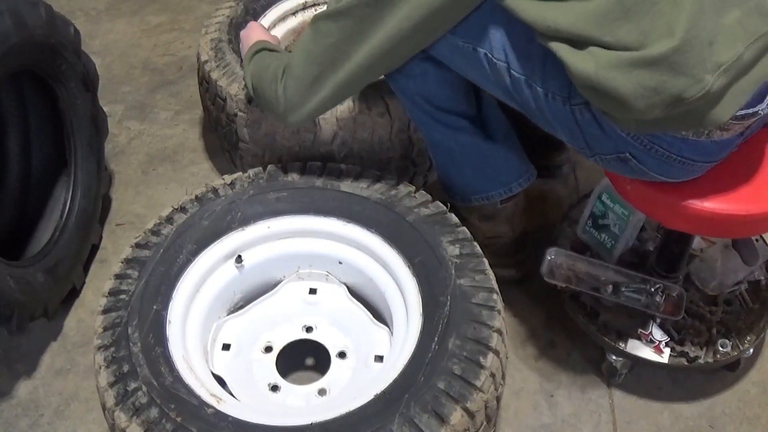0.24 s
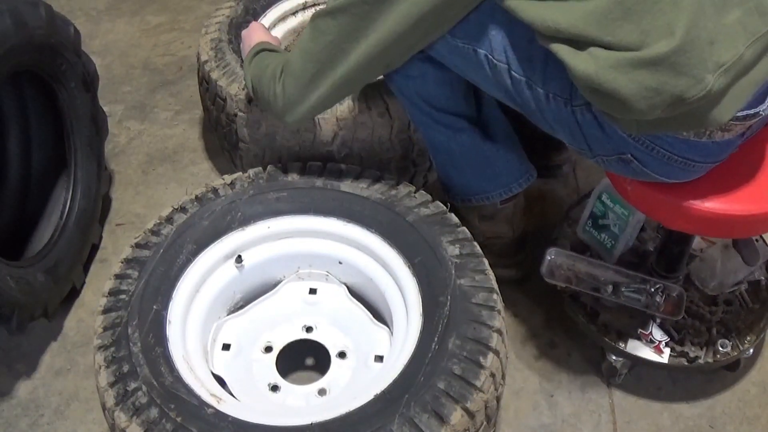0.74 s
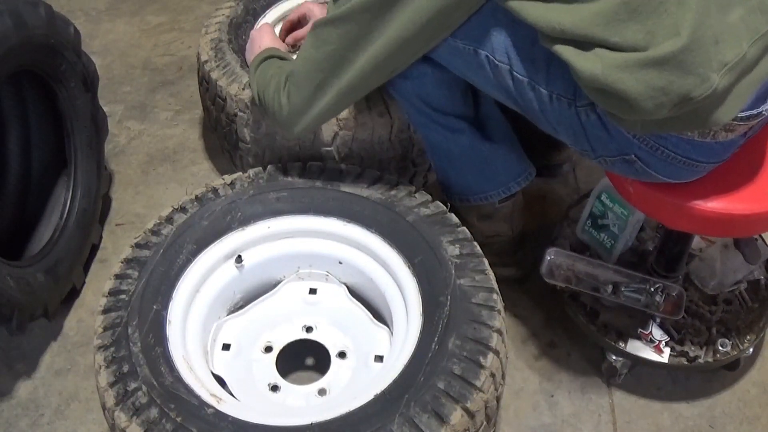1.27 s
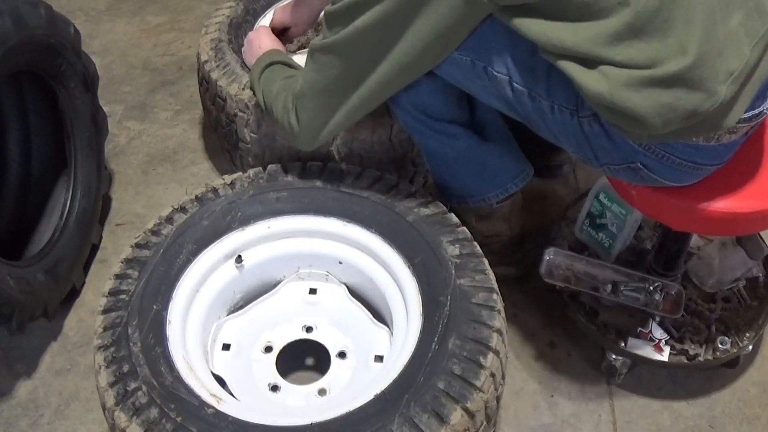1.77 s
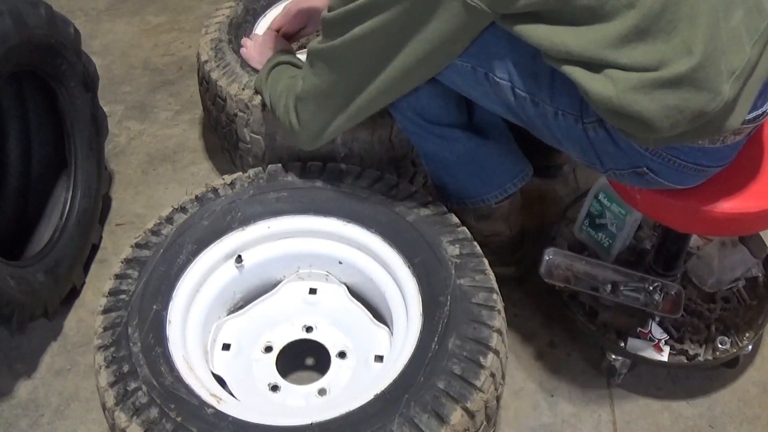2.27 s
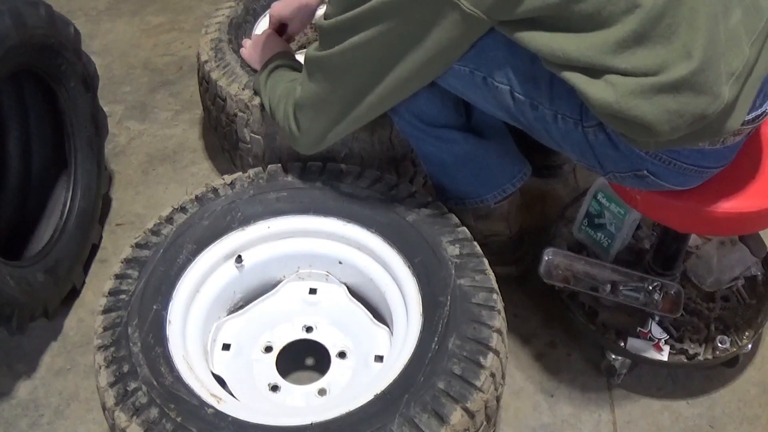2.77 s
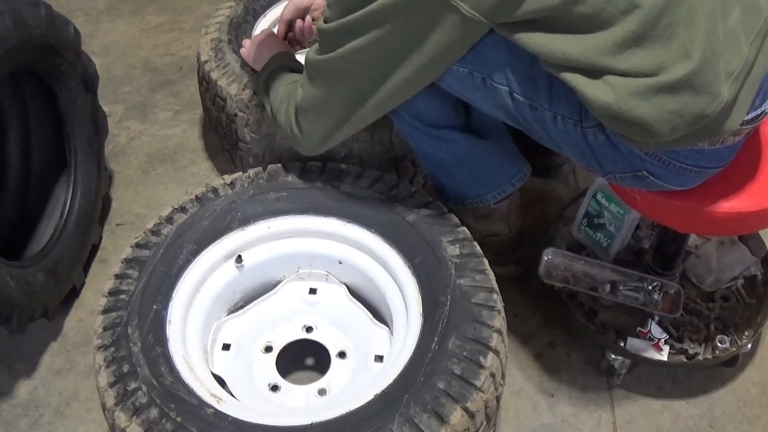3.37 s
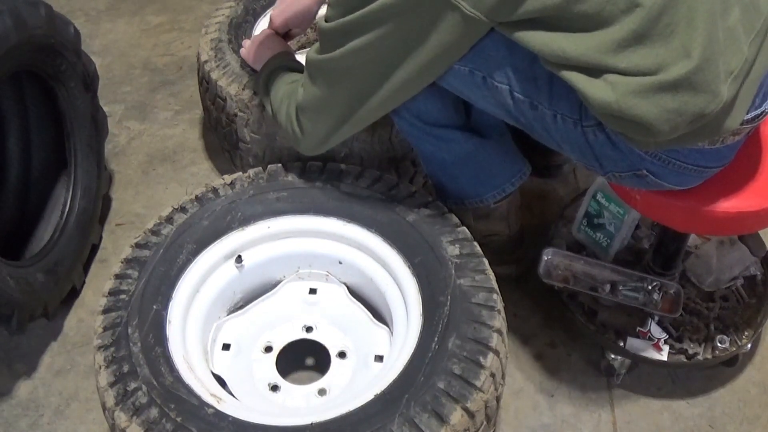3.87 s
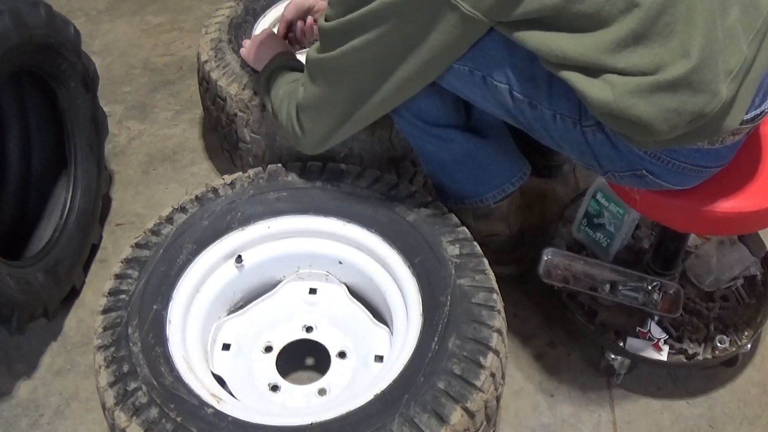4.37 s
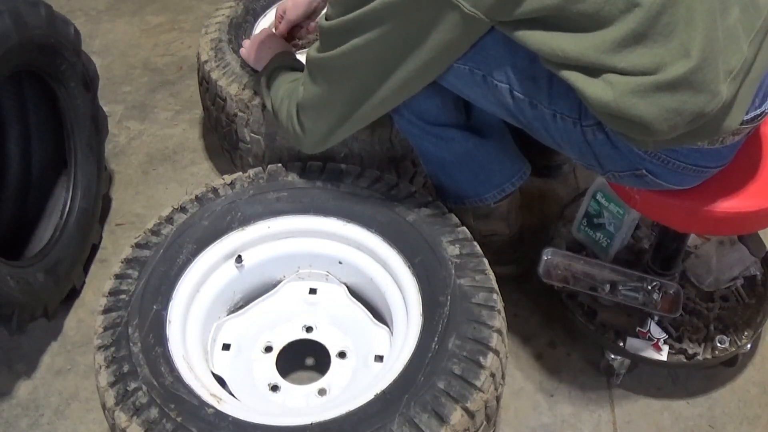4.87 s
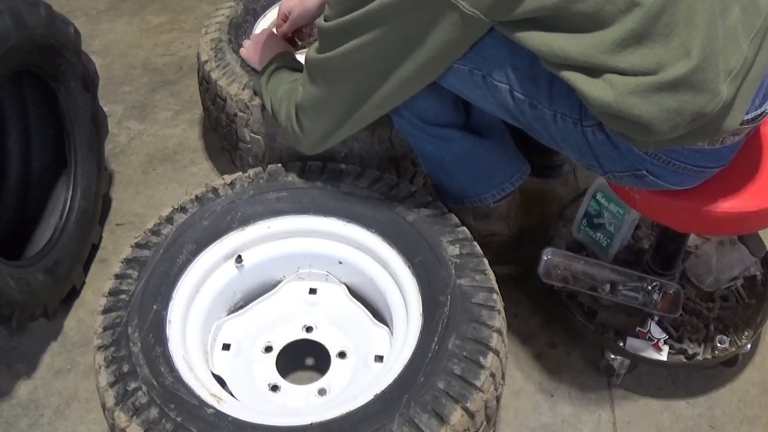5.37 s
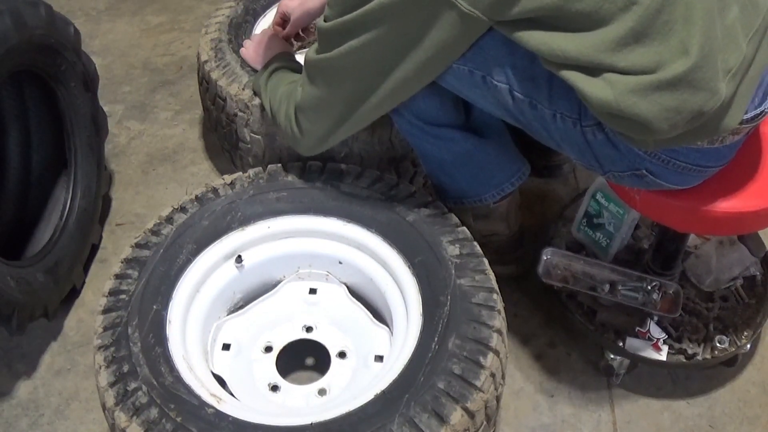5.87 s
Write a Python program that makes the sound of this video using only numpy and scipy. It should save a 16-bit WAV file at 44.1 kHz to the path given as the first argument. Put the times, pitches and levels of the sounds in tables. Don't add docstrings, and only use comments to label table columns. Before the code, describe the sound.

Close up, air rushes from a valve stem on a tractor tire, loud and steady at first, with dull thuds and metallic taps from handling. It dwindles to almost nothing, leaving a delicate descending whistle. A sharper click and a brief rub follow, then weak spurts of airy fizz swell and drop irregularly. The hard-walled garage adds a soft tail over a faint low murmur.

```python
import sys
import numpy as np
from scipy import signal
from scipy.fft import rfft, irfft, next_fast_len
from scipy.io import wavfile
from scipy.ndimage import uniform_filter1d

SR = 44100
rng = np.random.default_rng(int(sys.argv[2]) if len(sys.argv) > 2 else 0)


def transcribe(signal):
    frames = np.atleast_2d(signal).T
    limited = np.clip(frames, -1, 1)
    pcm = np.round(limited * 32767).astype(np.int16)
    wavfile.write(sys.argv[1], SR, pcm)


def linear_from_db(decibels):
    return 10 ** (np.asarray(decibels, float) / 20)


N = 270774

# [f/Hz, level per Hz/dB]
ROOM_AIR = [(18, -67), (30, -42), (359, -6.5), (426, -3), (495, -3.5), (2690, -6.5), (4040, -10),
            (5000, -11), (6500, -11), (11000, -120)]
MURMUR = [(15, -54), (25, -30), (54, -18.5), (97, -13), (135, -11), (300, -4.5), (390, -16), (660, -120)]
# [f/Hz, t60/s]
WALL_T60 = [(200, 0.87), (1000, 0.58), (4000, 0.16), (10000, 0.29)]
# [f/Hz, level/dB]
WALL_LEVEL = [(60, -28), (250, -8.5), (600, -5), (1200, -3.5), (2500, -6.5), (4000, -10.5), (6000, -9),
              (11000, -12)]
# [f/Hz, level/dB]
MIC_TILT = [(60, 0), (220, -0.5), (830, -0.5), (3090, -0.5), (11500, 0.5)]
# [t/s, level/dB]
HAND_SHADE = [(0, 1.6), (1.4, 1.8), (2.6, 1.1), (2.85, 2.2), (3.1, 0.8), (3.9, 0.6), (4.1, 1.8), (4.3, 0.1),
              (6.14, 0.1)]

# [spread/octaves, rise/cycles, t60 at 1 kHz/s, exponent by which high ones die sooner]
PING_KIND = (0.048, 3.4, 0.073, .05)
TAP_KIND = (0.1, 1.96, 0.077, 0.24)
CLICK_KIND = (0.22, 1.86, 0.043, 0.22)
SNAP_KIND = (0.412, 0.48, 0.087, 0.067)
SCUFF_KIND = (.8, 8.7, 0.26, 0.11)
THRUM_KIND = (0.21, 3.4, 0.15, .1)
# [t/s, level/dB, f/Hz]
TIRE_PINGS = [
    (0, -53.5, 506),
    (0, -50, 830),
    (0.864, -59, 1070),
    (.882, -63, 1030),
    (1.05, -50, 1075),
    (1.07, -51, 1070),
    (1.115, -60, 970),
    (1.516, -58, 453),
    (1.527, -53, 467),
]
# [t/s, level/dB, f/Hz]
RIM_TAPS = [(.0541, -40.5, 920), (0.0552, -39.5, 1290), (0.0547, -38.5, 1720), (.0661, -44, 880),
            (.856, -49.5, 1930), (1.044, -48.5, 1426), (1.047, -51, 2050), (1.7843, -58, 1004),
            (2.009, -51.5, 2750), (1.7471, -53, 567), (1.7651, -55.5, 571), (3.2144, -66, 550),
            (3.6721, -46.5, 3930), (3.6761, -58, 4200), (3.6811, -58, 3930), (3.697, -55, 3900),
            (3.707, -56, 4000), (3.6725, -65, 6100), (3.672, -51, 2820), (5.348, -58, 1340),
            (5.349, -64, 1640)]
# [t/s, level/dB, f/Hz]
VALVE_CLICKS = [(1.781, -47, 1080), (3.2001, -47, 620), (3.6728, -42.5, 1445), (3.6816, -53, 1110),
                (5.3473, -54, 1490), (5.3761, -54, 1480), (5.6717, -56, 1481), (5.9797, -57, 1520),
                (6.098, -60, 1090), (5.452, -57, 2750), (3.5143, -62, 3600), (3.5483, -60, 3580),
                (3.5842, -60, 3530), (3.6171, -66, 3330)]
# [t/s, level/dB, f/Hz]
RUBBER_SNAPS = [(.058, -51, 606), (1.704, -55, 1070), (1.782, -54, 1590), (1.784, -62, 222),
                (2.008, -52, 3360), (2.741, -62.5, 1220), (3.1994, -59, 1486), (3.284, -59, 1570),
                (3.674, -59.5, 527), (3.6712, -54, 2790), (3.6725, -59, 5020), (3.6725, -53, 10000),
                (5.347, -54, 2600), (5.348, -60, 4800)]
# [t/s, level/dB, f/Hz]
HAND_SCUFFS = [
    (1.78, -55, 624),
    (3.683, -57, 1200),
    (3.688, -58, 2800),
    (3.78, -67, 1515),
    (3.785, -61, 3010),
]
# [t/s, level/dB, f/Hz]
LOW_THRUMS = [
    (0, -46, 508),
    (.062, -49, 496),
    (.11, -53, 533),
    (0.169, -58, 476),
]

# [t/s, f/Hz]
SAGGING_TONES = [
    [(2.46, 8760), (2.55, 8600), (2.7, 8425), (2.76, 8355), (2.84, 8305), (3.0, 8165), (3.1, 8080),
     (3.36, 7840)],
    [(3.22, 9320), (3.33, 9230), (3.48, 8950)],
    [(3.56, 8670), (3.77, 8580), (4.0, 8410), (4.1, 8310), (4.25, 8155), (4.5, 7875), (4.8, 7520)],
]
# [level on resonance/dB, stem grip, sinking of resonance/Hz, gain/dB per s]
TONE_DRIVES = [(-39, 1.09, 9, -3), (-53, 0.78, 0.2, 0.2), (-49.5, 0.66, 22, 8.5)]
# [f/Hz, level/dB]
STEM_GRIP = [(7500, -41), (7900, -25), (8200, -10), (8330, 0.5), (8410, -4), (8470, -11), (8600, -14),
             (8730, -15), (9300, -20)]
# [f/Hz, blur 0-1]
STEM_BLUR = [(7500, 1), (8000, 0.5), (8200, 0.7), (8290, 0), (8450, 0.09), (8600, 0.3), (9300, .6)]
# [start t/s, length/s, f/Hz, top level/dB, blur 0-1]
HELD_TONES = [(1.099, 0.78, 8275, -45, 0.52), (3.74, 0.23, 4110, -63, 0.85), (4.032, .12, 6550, -66, .3),
              (4.62, 0.25, 8300, -71, .8), (4.33, 0.31, 9680, -69, .8), (5.84, 0.19, 9720, -65, .9),
              (1.859, 0.11, 4070, -61, 0.4), (1.119, 0.11, 3780, -52.5, 0.2),
              (1.338, 0.084, 4070, -49.5, 0), (1.399, 0.2, 4075, -55, 0.5),
              (5.376, 0.56, 4062, -68.5, 0.02), (5.605, 0.41, 4045, -63.5, 0.02),
              (3.816, 0.12, 4790, -66, 0.8), (5.454, 0.09, 4072, -59.5, 0), (5.552, 0.055, 4060, -59, 0),
              (5.62, 0.14, 4060, -64, 0), (5.701, 0.14, 4050, -63, 0), (5.77, 0.15, 4035, -62.5, 0),
              (5.82, .09, 3900, -64, .8), (5.899, 0.1, 4030, -66, .1), (6.058, 0.096, 4050, -73, .5)]

# [t/s, level/dB]
PRESSURE_FALL = [(0, -38.5), (.05, -39.5), (.75, -44), (1.54, -50), (1.85, -51.5), (2.6, -60), (2.85, -59),
                 (3.63, -66), (3.8, -66.5), (6.14, -68.5)]
# [pressure level/dB, fizz over pressure level/dB]
FIZZ_BY_PRESSURE = [(-71, -4), (-49, -4), (-47, -2.5), (-37.5, -5.5)]
# [peak t/s, fizz level/dB, jet level/dB, rise by 10 dB/s, fall by 10 dB/s]
CORE_PUFFS = [(3.71, -74, -65.5, 0.04, 0.13), (4.05, -60, -63.5, 0.059, 0.5), (4.18, -63, -69, 0.16, 0.25),
              (4.33, -62, -59, 0.38, 0.15), (4.67, -55.5, -61, 0.044, 0.13),
              (4.87, -66.5, -64, 0.12, 0.063), (5.0, -61.5, -77, 0.082, 0.15), (5.18, -73, -68, 0.064, 0.1),
              (5.31, -57.5, -62.5, 0.087, 0.32), (5.44, -65, -68, .08, 0.078),
              (5.505, -58.5, -76, 0.033, 0.033), (5.581, -78, -73, 0.021, 0.025),
              (5.655, -56.5, -62.5, 0.022, 0.13), (5.78, -59.5, -69, 0.12, 0.088),
              (5.86, -63.5, -62.5, 0.24, 0.13), (5.99, -57, -69, 0.15, 0.21)]
# [f/Hz, level per Hz/dB]
JET_SHAPE = [(1500, -28.5), (2200, -16.5), (2900, -14.5), (3550, -8), (3750, -3), (4150, -2), (4500, -11),
             (5300, -15.5), (6800, -16.5), (8000, -25), (9000, -90)]
UPPER_SHAPE = [(5000, -28), (6800, -17), (7200, -13), (7550, -4.5), (7950, -1), (8330, -3.5), (8450, -9.5),
               (8600, -19), (9000, -41), (10000, -52)]
RUSH_SHAPE = [(60, -67), (250, -10), (400, -9), (480, -3), (1000, -0.5), (1800, 2.5), (2400, -6.5),
              (3200, -3.5), (4200, -19), (7000, -90)]
FIZZ_SHAPE = [(4800, -51), (7200, -20), (8300, 2.5), (9000, 0), (9700, 2), (10300, 0.5), (11000, -2.5),
              (11500, -6)]
SPUTTER_SHAPE = [(4500, -33), (6200, -18), (7100, -10), (8300, -4), (8900, 2.5), (9700, 1.5), (10300, -2),
                 (11500, -7.5)]
# [f/Hz, width/Hz, lift/dB]
SEATED_MODES = [(1060, 150, 3), (1290, 150, -3), (2780, 100, 1.5), (3180, 150, 0.5), (3790, 90, 8),
                (3940, 60, -2), (4065, 70, 4.5), (4300, 150, 3), (4650, 250, 2), (5000, 150, 5),
                (5300, 250, -2), (6550, 60, 4), (6720, 120, -3), (7000, 100, 3), (7600, 120, 2),
                (7760, 80, -2), (7950, 120, 4), (8130, 100, -2), (8310, 130, 6), (8870, 80, -5),
                (9040, 150, 4), (9320, 200, -8), (9850, 120, -3), (10250, 300, 3), (10600, 120, 3),
                (10950, 150, 2)]
SLACK_MODES = [(2760, 100, 4), (3790, 90, -3), (4065, 70, 1), (4180, 200, 3), (7000, 300, -3),
               (8120, 250, 2), (8320, 120, -4), (9400, 150, -5), (9750, 150, -2)]
LOOSE_MODES = [(2300, 150, -3), (2780, 100, 5), (3150, 220, 4), (3350, 100, -3), (3700, 70, 5),
               (3880, 80, 3), (4060, 70, 4), (4400, 80, 4), (4780, 70, 7.5), (5130, 80, 4), (5380, 60, 4),
               (6050, 80, 3), (6600, 150, 6), (8330, 90, 3.5), (8930, 120, 3), (9300, 200, -1.5),
               (9680, 130, 5), (10040, 80, 2)]
# [t/s, t/s]
SLACK_SPAN = (1.8, 3.0)
LOOSE_SPAN = (3.55, 3.8)


def evened(x):
    return x / np.sqrt(np.mean(x ** 2) + 1e-20)


def read(points, hz):
    f, value = np.transpose(points)
    return np.interp(np.log(hz + 1), np.log(f + 1), value)


def add(mix, s, sound):
    part = mix[round(s * SR):][:len(sound)]
    part += sound[:len(part)]


def drift(shape, width, axis=0):
    once = uniform_filter1d(rng.standard_normal(shape), width, axis)
    return evened(uniform_filter1d(once, width, axis))


def colour(x, points):
    size = next_fast_len(x.shape[-1] + 8192)
    gain = linear_from_db(read(points, np.fft.rfftfreq(size, 1 / SR)))
    return irfft(rfft(x, size) * gain, size)[..., :x.shape[-1]]


def pressure(t):
    return np.interp(t, *np.transpose(PRESSURE_FALL))


def room_air():
    return linear_from_db(-66.5) * evened(colour(rng.standard_normal((2, N)), ROOM_AIR))


def building_murmur(t):
    murmur = linear_from_db(-84.5) * evened(colour(rng.standard_normal(N), MURMUR))
    return murmur * linear_from_db(0.21 * (pressure(t) + 56.5))


def garage(x):
    taps = np.zeros((2, SR))
    at = np.arange(250, SR - 20, 20)
    at = at + rng.integers(0, 20, (2, len(at)))
    np.put_along_axis(taps, at, rng.choice([-1., 1.], at.shape), 1)
    hz, t, z = signal.stft(taps, SR, nperseg=256)
    fade = linear_from_db(-60 * t / read(WALL_T60, hz)[:, None])
    fade = fade / np.linalg.norm(fade, axis=1)[:, None]
    tail = signal.istft(z * fade, SR, nperseg=256)[1]
    tail = colour(tail / np.linalg.norm(tail, axis=1)[:, None], WALL_LEVEL)
    return signal.fftconvolve(x[None], tail, axes=1)[:, :N]


def knock(db, hz, spread, rise, t60):
    t = np.arange(12000) / SR
    place = np.linspace(-1, 1, 40) + .04 * rng.standard_normal(40)
    phase = .42 * rng.random(40)
    weight = np.exp(-place ** 2)
    mode_hz = hz * 2 ** (1.575 * spread * place)
    modes = np.sin(2 * np.pi * (np.outer(t, mode_hz) + phase)) @ weight
    decay = linear_from_db(db + 2.5 - 60 * t / t60)
    return decay * (1 - np.exp(-t / rise)) ** 2 * modes / np.linalg.norm(weight)


def rim_and_rubber_blows():
    blows = np.zeros(N)
    for kind, rows in [(PING_KIND, TIRE_PINGS), (TAP_KIND, RIM_TAPS), (CLICK_KIND, VALVE_CLICKS),
                       (SNAP_KIND, RUBBER_SNAPS), (SCUFF_KIND, HAND_SCUFFS), (THRUM_KIND, LOW_THRUMS)]:
        spread, cycles, t60, slope = kind
        for s, db, hz in rows:
            add(blows, s, knock(db, hz, spread, cycles / hz, t60 * (1000 / hz) ** slope))
    return signal.sosfilt(signal.butter(2, 140, "high", fs=SR, output="sos"), blows)


def whistle(hz, level_db, blur, blur_hz=90, waver_hz=10.):
    blur = np.clip(blur, 0, 1)
    span = round(.4 * SR / blur_hz)
    wander = (drift(len(hz), span) + 1j * drift(len(hz), span)) / np.sqrt(2)
    cycles = np.cumsum(hz + waver_hz * drift(len(hz), 900)) / SR
    tone = (np.sqrt(1 - blur) + np.sqrt(blur) * wander) * np.exp(2j * np.pi * cycles)
    return np.sqrt(2) * linear_from_db(level_db) * tone.real * signal.windows.tukey(len(hz), .35)


def gliding(glide, db, grip, sunk, gain_db):
    t = np.arange(glide[0][0], glide[-1][0], 1 / SR)
    hz = np.interp(t, *np.transpose(glide))
    level_db = db + grip * read(STEM_GRIP, hz + sunk) + gain_db * (t - t.mean())
    return t[0], whistle(hz, level_db, read(STEM_BLUR, hz))


def held(start, length, hz, db, blur):
    u = np.linspace(-1, 1, round(length * SR))
    return start, whistle(hz + 0 * u, db - 19 * u ** 2, blur)


def gap_whistles():
    tones = np.zeros(N)
    for glide, drive in zip(SAGGING_TONES, TONE_DRIVES):
        add(tones, *gliding(glide, *drive))
    for row in HELD_TONES:
        add(tones, *held(*row))
    return tones


def lifted(x, modes):
    size = next_fast_len(N + 8192)
    fine = np.fft.rfftfreq(size, 1 / SR)
    lift_db = sum(db / (1 + (2 * (fine - f) / width) ** 2) for f, width, db in modes)
    return irfft(rfft(x, size) * linear_from_db(lift_db), size)[:N]


def flow(t):
    peak, fizz_db, jet_db, rise, fall = np.transpose(CORE_PUFFS)[..., None]
    puff = linear_from_db(-10 * np.maximum((peak - t) / rise, (t - peak) / fall) ** 1.04) ** 2
    loose = np.interp(t, LOOSE_SPAN, [0, 1])
    push_db = pressure(t)
    jet = linear_from_db(push_db - 3.5) ** 2
    jet = jet + loose * linear_from_db(-67.5) ** 2 + (puff * linear_from_db(jet_db) ** 2).sum(0)
    upper = linear_from_db(push_db + 0.5) ** 2
    rush = linear_from_db(-68 + 0.67 * (push_db + 59)) ** 2
    fizz = linear_from_db(push_db + np.interp(push_db, *np.transpose(FIZZ_BY_PRESSURE))) ** 2
    sputter = loose * linear_from_db(-69.5) ** 2 + (puff * linear_from_db(fizz_db) ** 2).sum(0)
    return jet, upper, rush, fizz, sputter


def hiss(patchy_db=1.0, flicker_db=0.16):
    frames, hz = N // 128 + 5, np.fft.rfftfreq(512, 1 / SR)
    shapes = [JET_SHAPE, UPPER_SHAPE, RUSH_SHAPE, FIZZ_SHAPE, SPUTTER_SHAPE]
    power = 0
    for shape, level in zip(shapes, flow(np.arange(frames) * 128 / SR)):
        share = linear_from_db(read(shape, hz)) ** 2 * (hz > shape[0][0]) * (hz < shape[-1][0])
        power = power + np.outer(level, share / share.mean())
    a, b = rng.standard_normal((2, frames, len(hz)))
    noise = a + 1j * b
    patches = evened(uniform_filter1d(drift(a.shape, 12), 8, 1))
    gusts = drift(frames, 6)[:, None] * (hz > 2500)
    z = noise * np.sqrt(power) * linear_from_db(patchy_db * patches + flicker_db * gusts)
    unit = signal.istft(noise.T, nperseg=512, noverlap=384)[1].std()
    air = signal.istft(z.T, nperseg=512, noverlap=384)[1][:N] / unit
    t = np.arange(N) / SR
    loose = np.interp(t, LOOSE_SPAN, [0, 1])
    slack = np.interp(t, SLACK_SPAN, [0, 1])
    seated = (1 - slack) * lifted(air, SEATED_MODES) + slack * lifted(air, SEATED_MODES + SLACK_MODES)
    return (1 - loose) * seated + loose * lifted(air, LOOSE_MODES)


def scene():
    t = np.arange(N) / SR
    blows = rim_and_rubber_blows()
    air = hiss() + gap_whistles()
    walls = garage(air + linear_from_db(0.5) * blows)
    shade = linear_from_db(np.interp(t, *np.transpose(HAND_SHADE)) * [[.5], [-.5]])
    return shade * air + blows + walls + room_air() + building_murmur(t)


def top_cut(x):
    return signal.sosfilt(signal.butter(12, 12080, fs=SR, output="sos"), x)


def record(dry):
    half = np.array(MIC_TILT) * [1, .5]
    x = np.array([colour(dry[0], half), colour(dry[1], half * [1, -1])])
    band_limit = signal.firwin(2001, 11025, window=("kaiser", 9), fs=SR)
    x = signal.oaconvolve(x, band_limit[None], "same")
    return top_cut(x)


dry = scene()
out = record(dry)
transcribe(out)
```